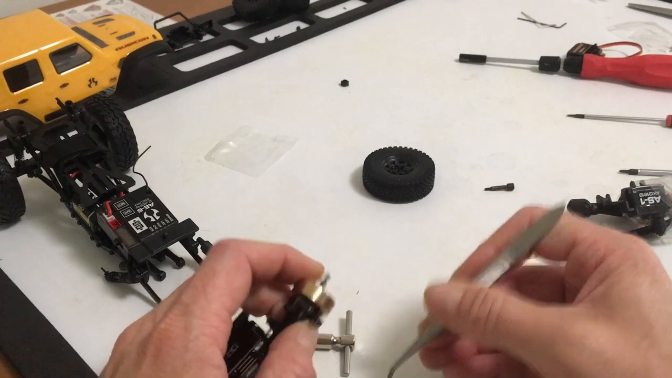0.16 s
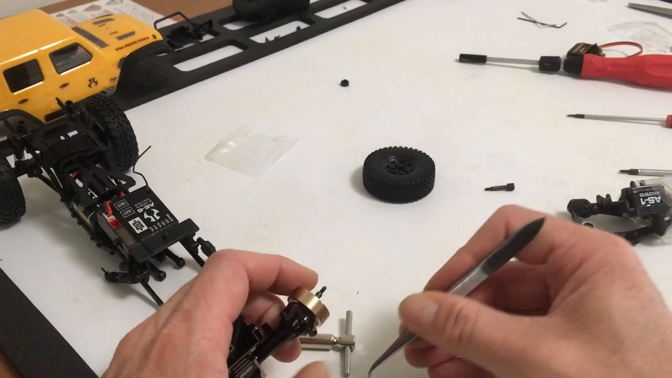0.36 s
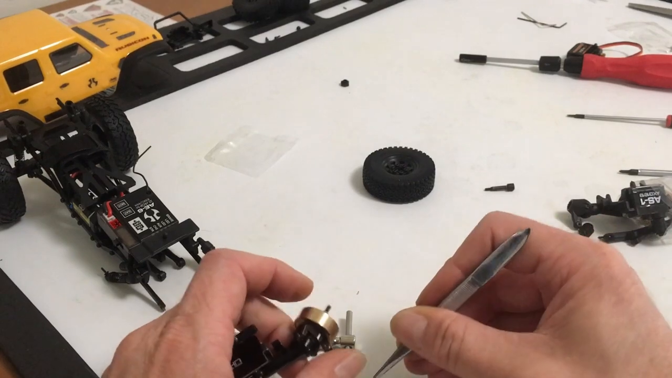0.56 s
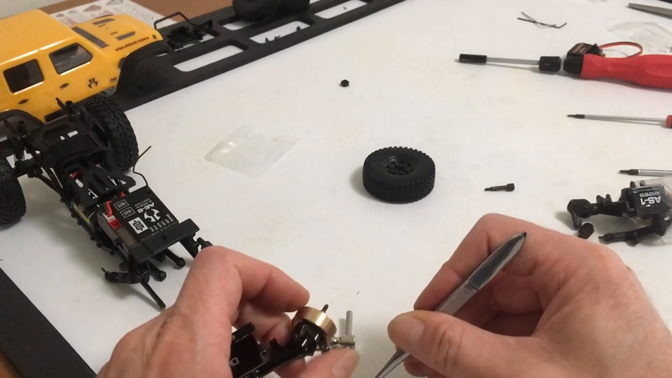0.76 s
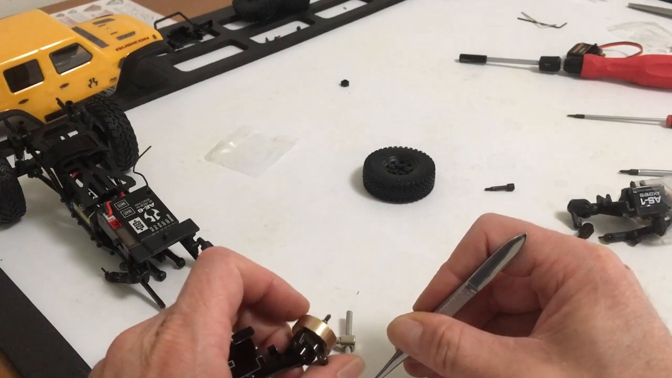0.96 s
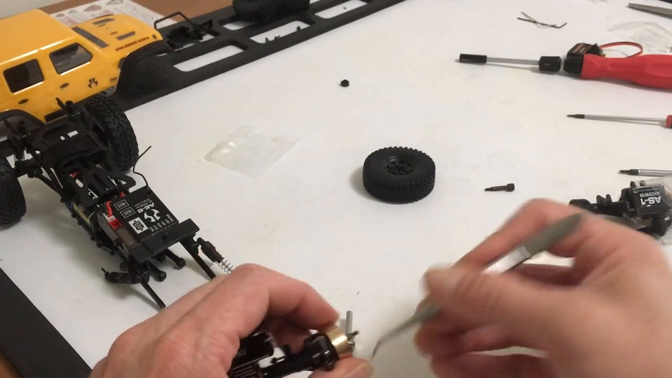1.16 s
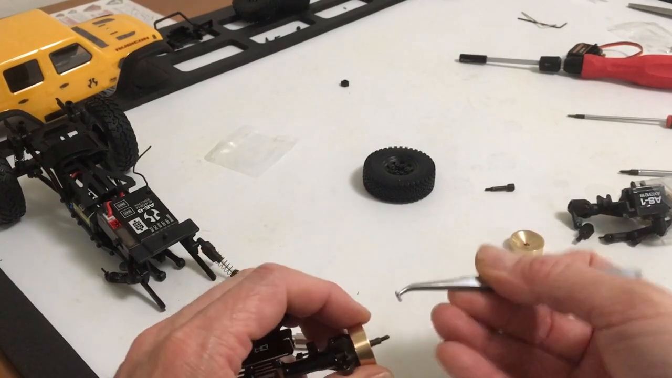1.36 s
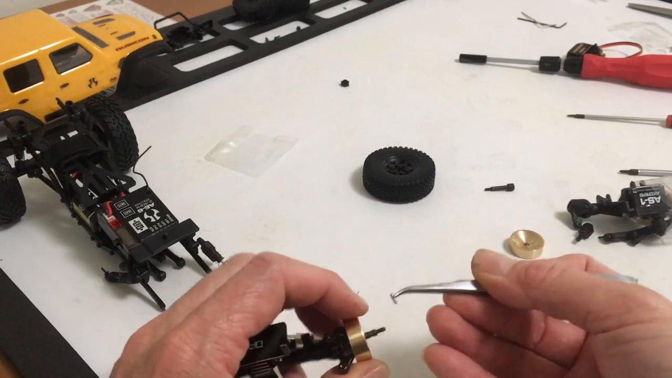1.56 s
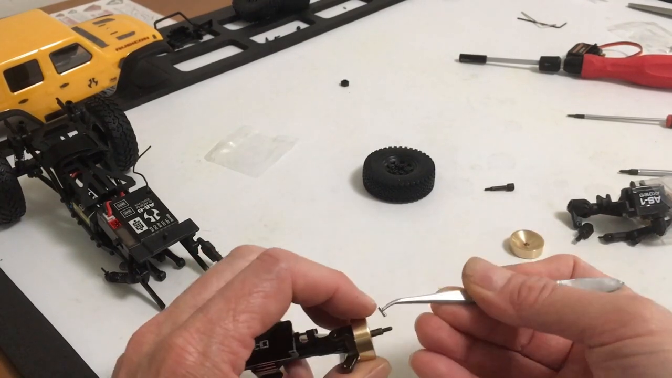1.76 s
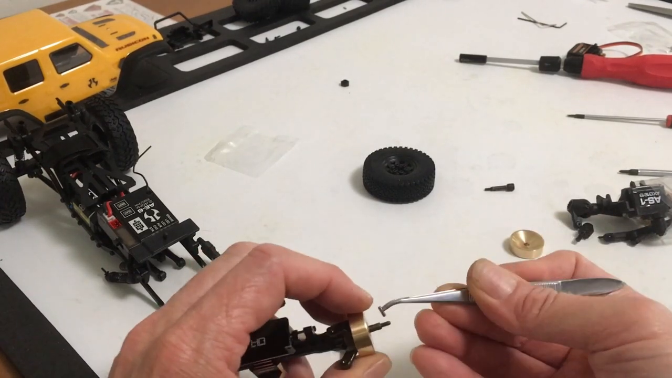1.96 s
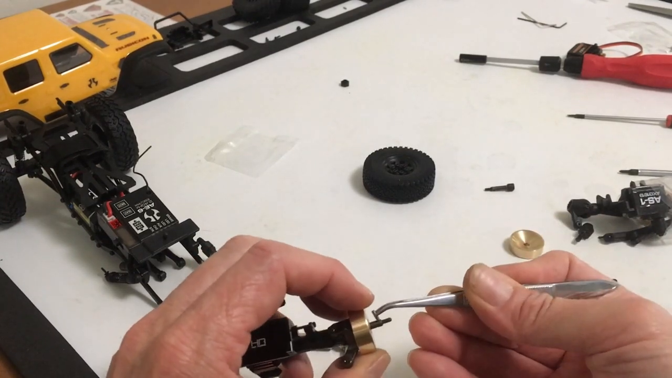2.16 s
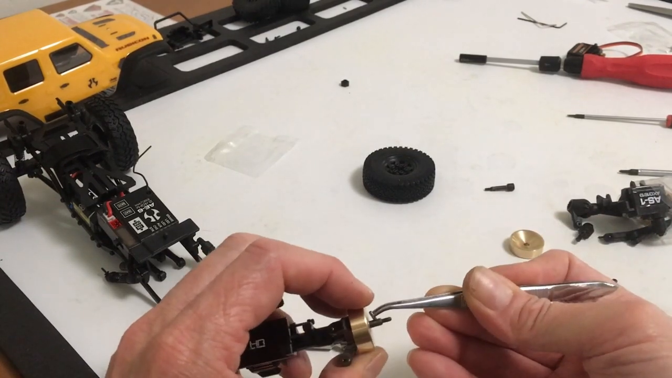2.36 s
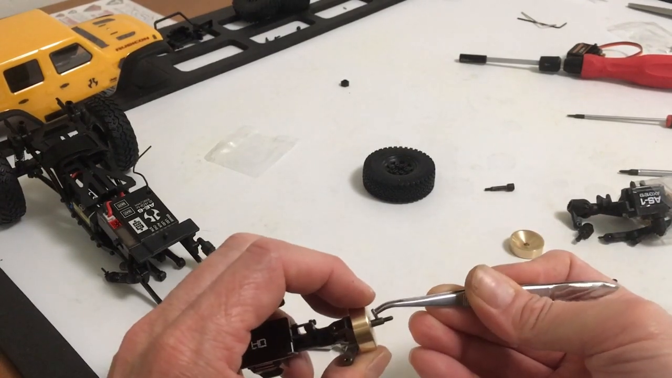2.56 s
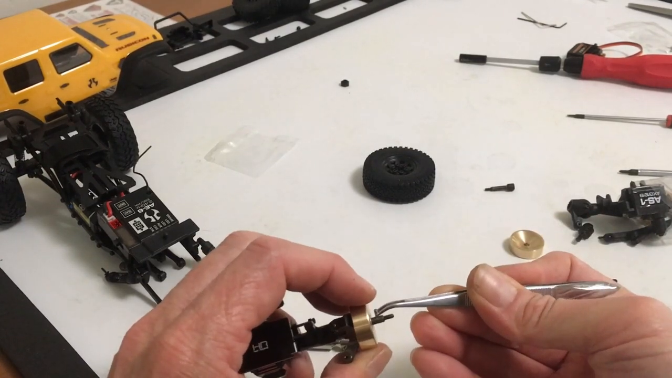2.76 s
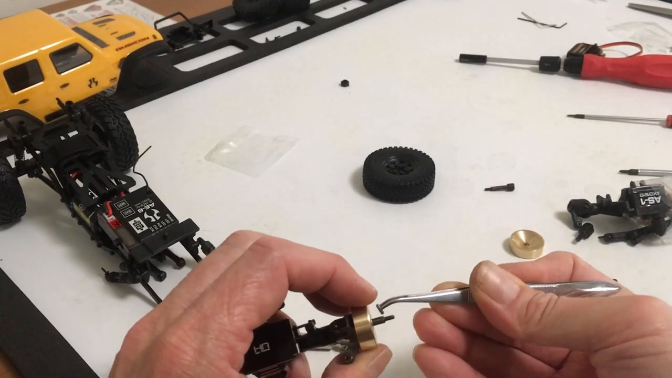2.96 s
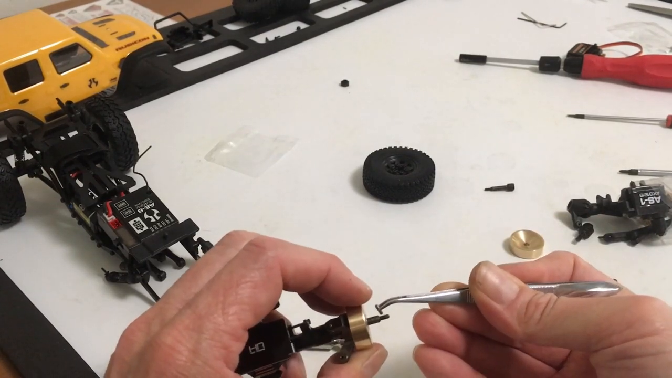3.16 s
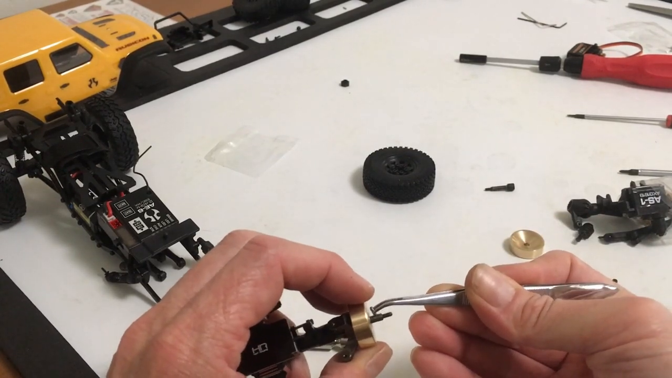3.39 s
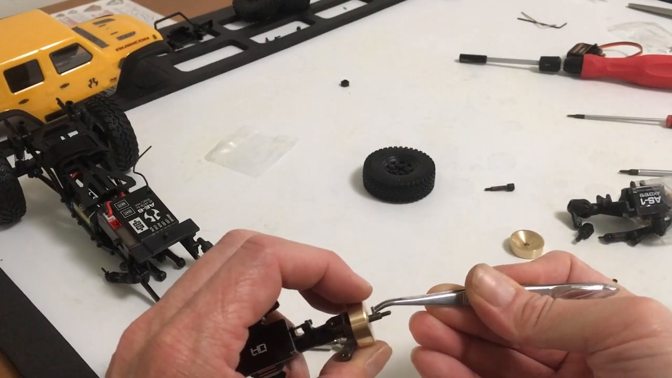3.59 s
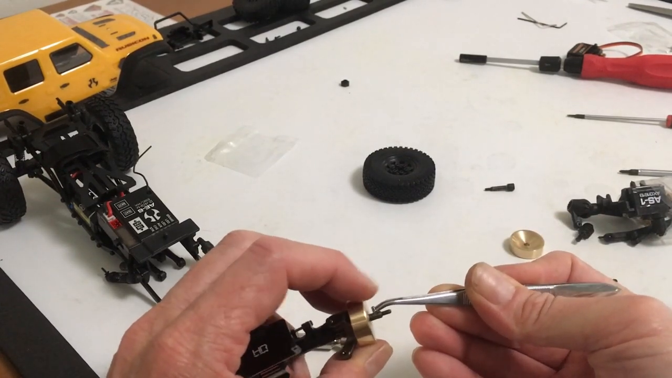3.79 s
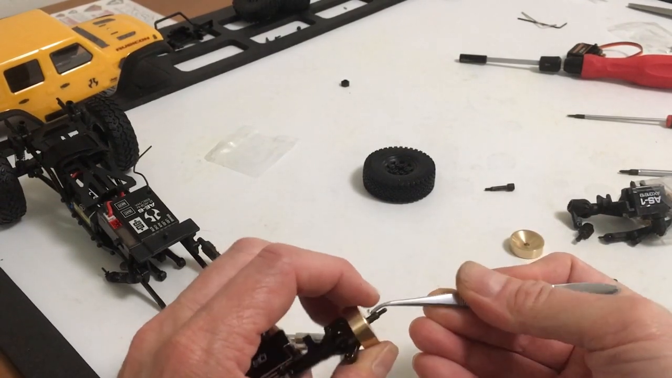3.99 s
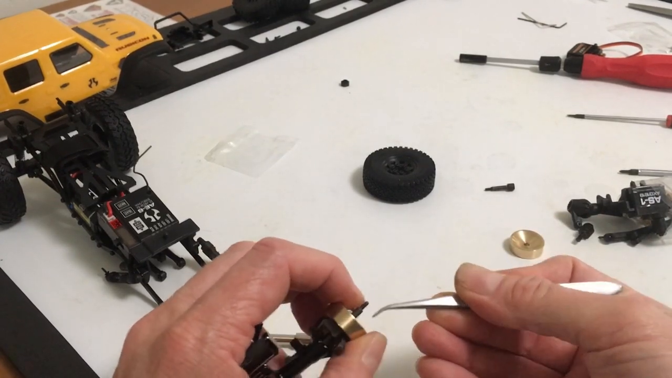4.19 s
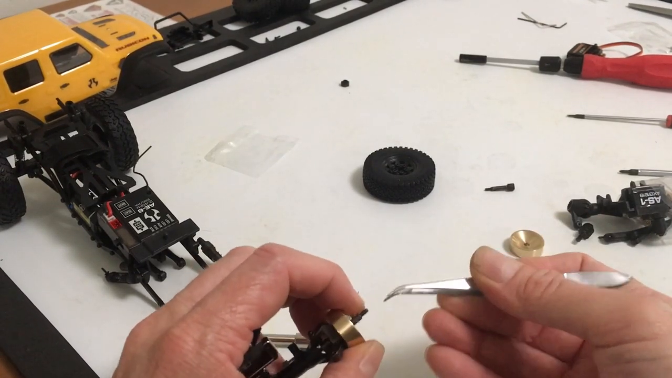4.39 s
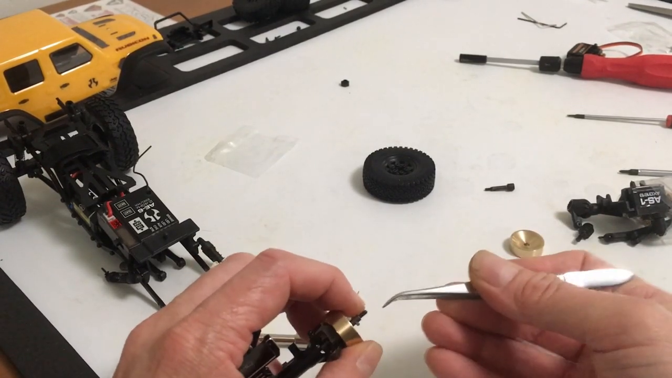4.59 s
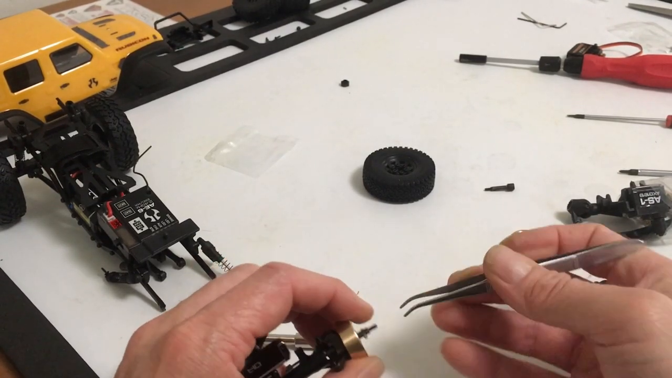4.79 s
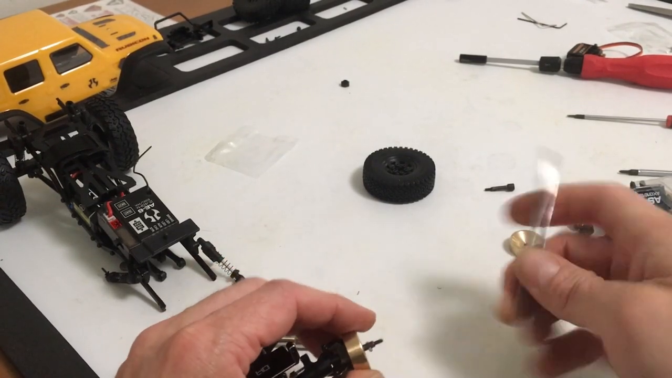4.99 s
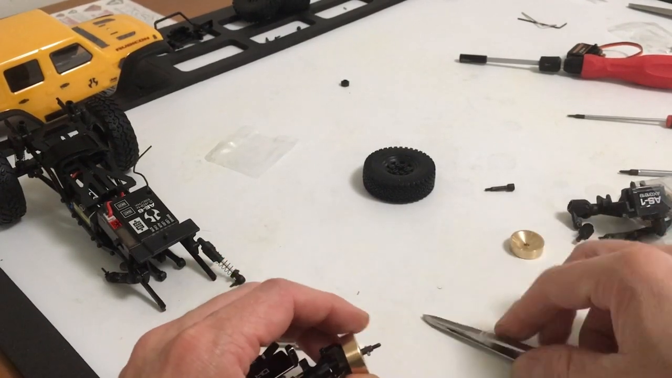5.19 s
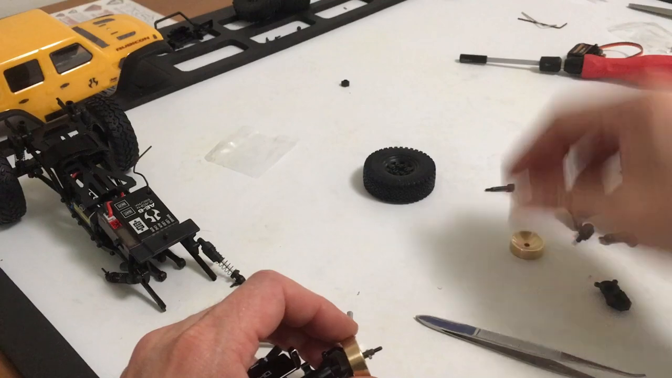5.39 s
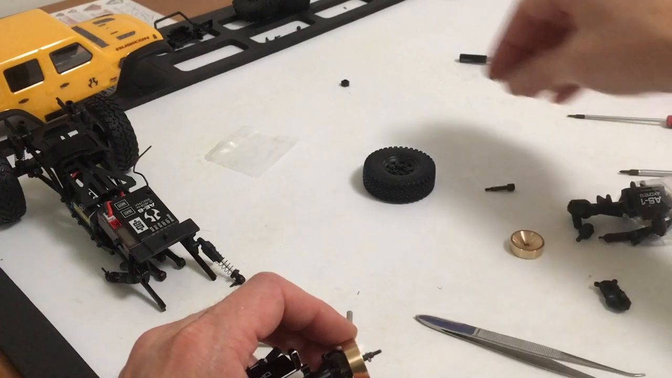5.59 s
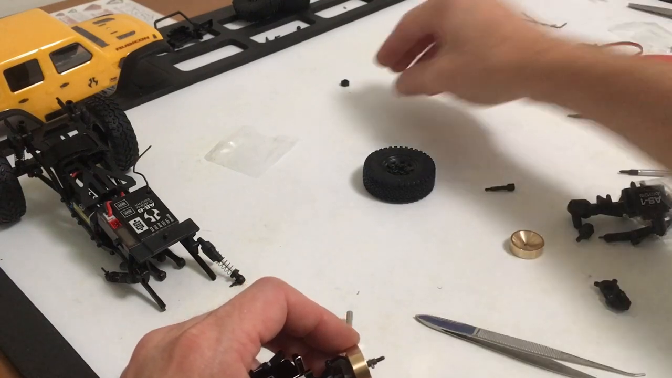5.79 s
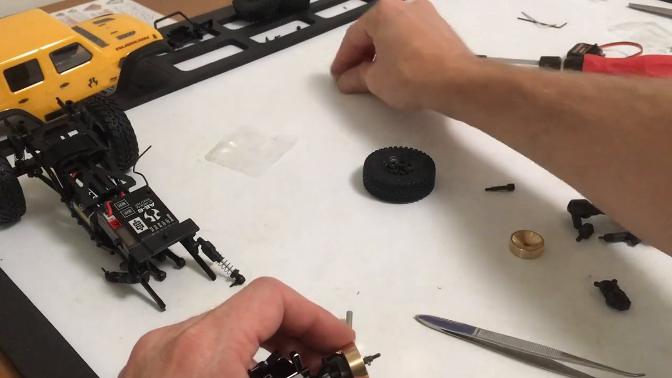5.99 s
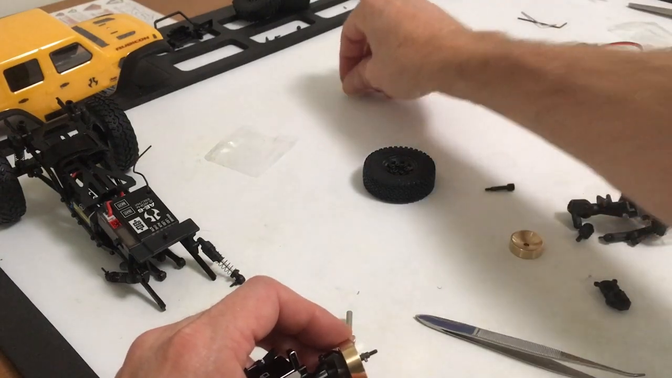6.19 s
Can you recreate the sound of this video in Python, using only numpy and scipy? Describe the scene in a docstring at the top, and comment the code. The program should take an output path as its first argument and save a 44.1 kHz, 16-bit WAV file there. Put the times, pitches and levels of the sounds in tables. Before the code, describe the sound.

In a small, quiet, humming room, a close microphone catches an early knock with a deep bench thump and a brief rustle. A crisp snap and more soft thumps follow, then tiny gritty ticks of steel tweezers on a metal pin. A bright snap rings out just after four seconds. Past five, the tweezers drop and clatter in quick bounces, loudest of all, before soft thumps and brushing.

```python
"""Throughout, a small quiet room hums and hisses and a stand trembles on a low note.
Early and late, sleeve and skin brush a mat; knocks excite the damped modes of a workbench, jolts set it swinging.
Then steel tweezers tick on a tiny axle pin in short gritty bursts; low soft thumps and ringing snaps join in.
Near the end the tweezers drop and bounce: each blow is a crack, ringing modes, a thud and the room's echoes.
A microphone with a peak near 3 kHz filters all of it and adds a faint hiss."""
import sys
import numpy as np
from scipy import signal
from scipy.fft import rfft, irfft, next_fast_len
from scipy.io import wavfile
from scipy.ndimage import map_coordinates

SR = 44100
rng = np.random.default_rng(int(sys.argv[2]) if len(sys.argv) > 2 else 0)


def persist_wave(psi):
    """Save psi, clipped to +-1, as 16-bit WAV."""
    counts = np.round(np.clip(psi, -1, 1) * 32767).astype(np.int16)
    wavfile.write(sys.argv[1], SR, np.atleast_2d(counts).T)


N = 275625


def amp(db):
    """Decibels express amplitude on a logarithmic scale: 20 dB is a factor of ten."""
    return 10 ** (np.asarray(db) / 20)


def unit(x):
    """Effective level is the root mean square; scale it to 1."""
    return x / np.sqrt(np.mean(x ** 2) + 1e-20)


def along(points, hz):
    """Pitch is logarithmic in frequency: interpolate (f/Hz, value) points on a log axis."""
    f, value = np.transpose(points)
    return np.interp(np.log(hz + 1), np.log(f + 1), value)


def curve(rows):
    """A level envelope: gain per sample from (t/s, level/dB) rows, -150 dB outside them."""
    s, db = np.transpose(rows)
    return amp(np.interp(np.arange(N) / SR, s, db, -150, -150))


def filtered(x, response):
    """Linear filtering: the spectrum is multiplied by a response of frequency."""
    size = next_fast_len(len(x) + 8192)
    hz = np.fft.rfftfreq(size, 1 / SR)
    return irfft(rfft(x, size) * response(hz), size)[:len(x)]


def noise(spectrum, count):
    """Coloured noise: white noise shaped by a spectrum, at rms 1."""
    return unit(filtered(rng.standard_normal(count), lambda hz: amp(along(spectrum, hz))))


def wobble(rate):
    """Slow random modulation: a smooth curve through rate random knots a second."""
    knots = rng.standard_normal(int(N * rate / SR) + 4)
    return map_coordinates(knots, [np.arange(N) * rate / SR])


def add(track, s, sound):
    """Superposition: pressures sum, so a sound is mixed in at time s."""
    part = track[round(s * SR):][:len(sound)]
    part += sound[:len(part)]


def air():
    """Broadband room tone: steady hiss above a low rumble of wavering level."""
    # spectrum of the room tone: f/Hz, relative density/dB
    tone_spectrum = [(20, -11), (40, 7), (70, -18.5), (100, -9), (160, -3), (280, -10), (460, -20.5),
                     (900, -31.5), (1400, -27.5), (2500, -31.5), (4000, -43.5), (8000, -42.5), (10500, -49),
                     (13000, -62), (16000, -68)]
    # level of the rumble before its waver: t/s, level/dB
    rumble_level = [(0, -76), (.4, -65), (1.04, -67.5), (1.3, -60.5), (1.9, -61.5), (2.4, -60),
                    (2.9, -65.5), (3.2, -61.5), (3.9, -63.5), (4.1, -58.5), (4.4, -60.5), (5.4, -62.5),
                    (5.75, -56), (6.25, -55)]
    tone = noise(tone_spectrum, N)
    rumble = filtered(tone, lambda hz: 1 / (1 + (hz / 600) ** 2))
    waver = amp(1.5 * wobble(7))
    hiss = amp(-59.5) * (tone - rumble)
    return hiss + curve(rumble_level) * waver * unit(rumble)


def stand():
    """A damped resonator: jolts start free decay, and resting hands drive it with noise into a steady tremble."""
    # jolts of the bench: t/s, level/dB, t60/s
    jolts = [(0.108, -30.5, 0.23), (0.123, -20.5, 0.27), (0.187, -28, 0.88), (0.249, -29, 0.54),
             (0.338, -32, 0.19), (0.761, -43, 0.43), (1.331, -30, 0.41), (1.439, -26, 0.23),
             (2.317, -42.5, 0.22), (2.789, -42, 0.61), (3.001, -40, 0.19), (4.17, -32, 0.49),
             (4.468, -43.5, 0.33), (4.729, -47, 1), (5.056, -39, 0.7), (5.252, -26.5, 0.15),
             (5.371, -27, 0.27), (5.476, -38.5, 1), (5.934, -32, 0.31), (6.069, -32.5, 0.1)]
    note_hz, width_hz = 70.74, 14
    out, t = np.zeros(N), np.arange(SR) / SR
    swell = 1 - np.exp(-t / 0.0039)
    note = np.sin(2 * np.pi * note_hz * t)
    for s, db, t60 in jolts:
        decay = amp(db - 60 * t / np.clip(t60, .05, 1.5))
        add(out, s, decay * swell * note)

    def resonance(f):
        damping = 1j * f * width_hz
        return damping / (note_hz ** 2 - f * f + damping)

    tremble = unit(filtered(rng.standard_normal(N), resonance))
    return out + amp(-58.5 + 1.2 * wobble(2.91)) * tremble


def brushing():
    """Sliding friction: skin and sleeve make finely uneven noise; each stroke rises, holds and fades."""
    # strokes on the mat: start of hold t/s, hold/s, level/dB
    strokes = [(0, 0.036, -71.5), (0.132, 0.019, -57), (0.277, 0.12, -72), (0.656, 0.089, -80),
               (.86, 0.062, -81), (1.194, 0.06, -77.5), (1.337, 0.086, -64), (4.32, 0.045, -79),
               (4.666, 0.22, -73.5), (5.023, 0.089, -70.5), (5.55, 0.073, -66), (5.686, 0.16, -74.5),
               (5.905, 0.043, -70.5), (6.088, 0.031, -67.5), (6.156, 0.071, -60.5)]
    # spectrum of the friction: f/Hz, relative density/dB
    cloth = [(200, -29), (600, 4), (1500, 8), (3000, 7), (5000, -3), (8000, -14.5), (14000, -26)]
    rise_db_per_s, fall_db_per_s = 185, 158
    t = np.arange(N) / SR
    level = np.zeros(N)
    for s, hold, db in strokes:
        before = np.maximum(s - t, 0)
        after = np.maximum(t - s - hold, 0)
        level += amp(db - rise_db_per_s * before - fall_db_per_s * after)
    grain = amp(1.5 * wobble(90))
    return level * grain * noise(cloth, N)


def struck(spectrum, burst):
    """Contact excitation: a burst of scratchy micro-contacts, and one clean impact of the same colour and energy."""
    colour = lambda hz: amp(along(spectrum, hz))
    scratch = filtered(rng.standard_normal(len(burst)) * burst, colour)
    scratch = scratch / np.max(np.abs(scratch))
    impulse = 1. * (np.arange(len(burst)) == SR // 1500)
    clean = filtered(impulse, colour)
    return scratch, clean * np.linalg.norm(scratch) / np.linalg.norm(clean)


def ringing(modes, t):
    """Modal synthesis: damped sines (f/Hz, level/dB, t60/s) at scattered strengths, rising over the contact."""
    scatter_db, rise_s = 2.5, 0.00069
    total = np.zeros(len(t))
    for hz, db, t60 in modes:
        strength = db + rng.normal(0, scatter_db)
        total += amp(strength - 60 * t / t60) * np.sin(2 * np.pi * hz * t)
    return (1 - np.exp(-t / rise_s)) * total


def room(x):
    """Reverberation: first echoes and a fresh diffuse tail, in which each frequency decays at its own speed."""
    # reverberation time: f/Hz, t60/s
    reverberation = [(150, 0.36), (700, 0.64), (1800, 0.57), (4800, 0.49), (12000, 0.34)]
    # first echoes, against a tail of unit energy: t/s, level/dB
    walls = [(.0095, -9), (.017, -10), (0.026, -28)]
    hz, t, z = signal.stft(rng.standard_normal(SR * 3 // 4), SR, nperseg=256)
    decay = amp(-60 * t / along(reverberation, hz)[:, None])
    build_up = 1 - np.exp(-t / 0.0037)
    tail = signal.istft(z * decay * build_up, SR, nperseg=256)[1]
    tail = tail / np.linalg.norm(tail)
    for s, db in walls:
        tail[round(s * SR)] += amp(db)
    return signal.fftconvolve(x, tail)


def blow(db, top_db, thud_db, blade_db, pin_db, room_db, t60):
    """Impact excitation of coupled bodies: a crack, ringing blades, pin and bench, a thud, and the room's answer."""
    # colour of the contact: f/Hz, gain/dB
    crack_spectrum = [(300, -94), (900, -3.5), (2000, -3.5), (3200, -5.5), (4200, -14.5), (6000, -24.5),
                      (9000, -38.5), (15000, -45)]
    # colour of the bench thud: f/Hz, relative gain/dB
    thud_spectrum = [(60, -31), (150, 7), (300, 0), (600, 3.5), (1200, -13), (2500, -96)]
    # modes, before scatter and mix, of tweezer blades, axle pin, bench top and bench frame: f/Hz, level/dB, t60/s
    blade_modes = [(3850, -4, .008), (4350, 0, .009), (4750, -8, .008), (5550, -10, .006),
                   (6500, -11, .006), (7700, -17, .004), (9000, -18, .004)]
    pin_modes = [(6800, 0, .004), (8200, -5, .003), (9400, -5, .003), (12400, -5, .005), (14000, -11, .003),
                 (15300, -5, .005)]
    top_modes = [(800, -6, .03), (1000, -5, .03), (1180, -5, .05), (1295, -5, .07), (1550, -5, .03),
                 (1700, -6, .05), (2170, -3, .03)]
    frame_modes = [(136, -1, 0.84), (196.5, -3, 0.23), (264, 3.5, 0.19), (361.3, 3.5, 0.36),
                   (475.3, -0.5, 0.66), (625, -4, 0.57)]
    scratch_db, impact_db = 0.4, -5.5  # shares of the crack
    frame_db = -11.5  # relative to the thud

    t = np.arange(SR // 2) / SR
    burst = amp(-60 * t / np.clip(t60, .003, .08)) * (1 - np.exp(-t / .0004))
    scratch, clean = struck(crack_spectrum, burst)
    pin = amp(pin_db) * ringing(pin_modes, t)
    thud = amp(-60 * t / 0.1) * (1 - np.exp(-t / 0.0033)) * noise(thud_spectrum, len(t))
    body = amp(blade_db) * ringing(blade_modes, t)
    body += amp(top_db) * ringing(top_modes, t)
    body += amp(thud_db) * thud
    # the frame's sound travels through the bench, not the air, so the room does not answer it
    frame = amp(thud_db + frame_db) * ringing(frame_modes, t)
    # the room answers the clean impact, the bodies and a little of the pin
    sound = amp(room_db) * room(clean + body + .4 * pin)
    crack = amp(scratch_db) * scratch + amp(impact_db) * clean
    add(sound, 0, crack + body + pin + frame)
    return amp(db) * sound


def knocks():
    """Impact on a damped plate: parts and knuckles knock the bench."""
    # knocks: t/s, level/dB, contact t60/s, then against the crack: thud/dB, blades/dB, room/dB
    knock_rows = [(0.101, -29.5, 0.05, -5.5, 0, -4), (0.6489, -48, 0.006, -7, -35, 1.5),
                  (0.677, -53, 0.017, -18, -23, -13), (1.3201, -44, 0.013, -10, -27, -23),
                  (1.4328, -66, .02, 9, -8, -18), (4.7193, -52, .012, -7, -29, -6),
                  (5.8971, -44, 0.038, 0.5, -28, -6), (5.9196, -50.5, 0.0047, -12, -22, 8)]
    top_db, pin_db = -9.5, -26
    out = np.zeros(N)
    for s, db, t60, thud_db, blade_db, room_db in knock_rows:
        add(out, s, blow(db, top_db, thud_db, blade_db, pin_db, room_db, t60))
    return out


def ticks():
    """Micro-contact noise: the tips touch the pin in a short gritty scrape of treble; the room answers a clean tap."""
    # light ticks of the tweezer tips: t/s, level/dB
    tick_rows = [(0.4827, -57), (0.751, -66), (1.1635, -57.5), (1.7724, -55), (1.983, -62), (2.0715, -60),
                 (2.3704, -55), (2.5977, -62), (2.6597, -63), (2.765, -57), (2.802, -64), (2.9785, -60),
                 (2.9917, -60), (3.0038, -56), (3.202, -61.5), (3.2828, -65), (3.417, -71), (3.4746, -64),
                 (3.583, -66), (3.883, -64), (3.91, -61), (4.366, -60), (4.625, -59.5), (5.111, -56.5),
                 (5.2168, -46), (5.6459, -63), (6.025, -56)]
    # colour of the tip contact: f/Hz, relative gain/dB
    tip = [(1500, -5), (3000, 7.5), (4500, 2), (5500, 3), (6500, -4), (9000, -30)]
    out, t = np.zeros(N), np.arange(SR // 20) / SR
    burst = amp(-60 * t / 0.011) * (1 - np.exp(-t / 0.00025))
    for s, db in tick_rows:
        scratch, clean = struck(tip, burst)
        add(out, s, amp(db) * scratch)
        add(out, s, amp(db - 6.5) * room(clean))
    return out


def thumps():
    """Soft-contact excitation: the heel of the hand lands, and a few low cycles swell and die fast."""
    # thumps of the bench: t/s, level/dB, f/Hz
    thump_rows = [(.757, -51, 200), (1.3205, -40, 150), (1.432, -40, 169), (5.9, -31.5, 145),
                  (5.941, -44, 143), (6.071, -48, 147)]
    t60_s, rise_s = 0.081, 0.0025
    out, t = np.zeros(N), np.arange(SR // 4) / SR
    swell = 1 - np.exp(-t / rise_s)
    for s, db, hz in thump_rows:
        add(out, s, amp(db - 60 * t / t60_s) * swell * np.sin(2 * np.pi * hz * t))
    return out


def snaps():
    """Sudden release: the blades snap off the pin, and the modes of both ring freely."""
    # snaps: t/s, level/dB, then against the crack: blades/dB, pin/dB, room/dB
    snap_rows = [(0.8165, -39, 2.5, 1, -3), (2.755, -52, -6, -16, -10), (4.1527, -44, 8, 4, -20),
                 (4.156, -35.5, 6.5, 11.5, -10.5)]
    top_db, thud_db, t60_s = -20, -19, 0.018
    out = np.zeros(N)
    for s, db, blade_db, pin_db, room_db in snap_rows:
        add(out, s, blow(db, top_db, thud_db, blade_db, pin_db, room_db, t60_s))
    return out


def bounces():
    """Repeated impact: the dropped tweezers land on the bench and bounce."""
    # landings: t/s, level/dB, contact t60/s, then against the crack: bench top/dB, blades/dB, room/dB
    bounce_rows = [(5.2391, -14, 0.0094, -12, -39, -4), (5.2569, -23.5, 0.054, -3, -24, -9.5),
                   (5.3414, -17, 0.019, -8.5, -5.5, -4), (5.372, -22, 0.023, -4.5, -25, -4),
                   (5.382, -18.5, 0.021, -16, -31, -10)]
    thud_db, pin_db = -13, -43
    out = np.zeros(N)
    for s, db, t60, top_db, blade_db, room_db in bounce_rows:
        add(out, s, blow(db, top_db, thud_db, blade_db, pin_db, room_db, t60))
    return out


def scene():
    """Superposition of all sources at the microphone."""
    background = air() + stand() + brushing()
    contacts = knocks() + ticks() + thumps() + snaps() + bounces()
    return (background + contacts)[None]


def record(dry):
    """Port resonance: the microphone dips just under its peak, adds hiss and cuts off above its band limit."""
    band_limit_hz = 15800
    pole = lambda f, hz, width_hz: hz ** 2 - f * f + 1j * f * width_hz

    def port(f):
        lower = pole(f, 2749, 540) / pole(f, 3158, 450)
        upper = pole(f, 3358, 490) / pole(f, 3248, 417)
        return lower * upper

    hiss = amp(-76.5) * rng.standard_normal(N)
    heard = filtered(dry[0], port) + hiss
    return filtered(heard, lambda hz: hz < band_limit_hz)[None]


dry = scene()
out = record(dry)
persist_wave(out)
```